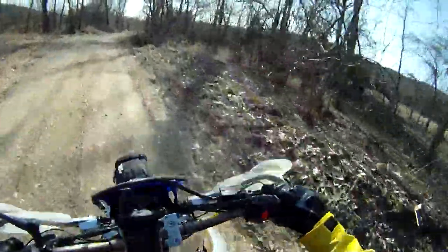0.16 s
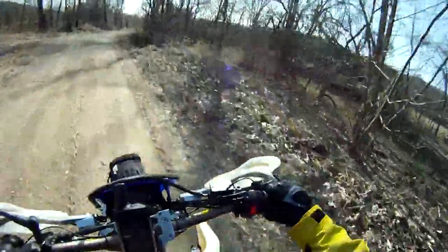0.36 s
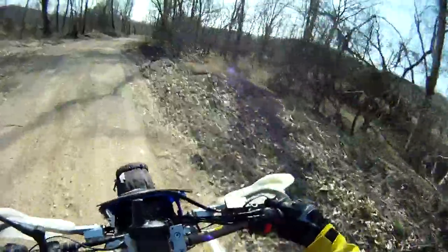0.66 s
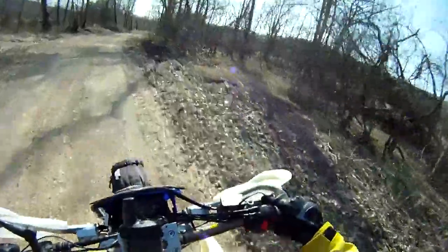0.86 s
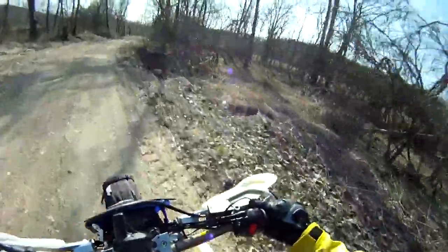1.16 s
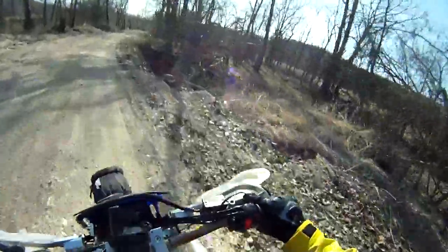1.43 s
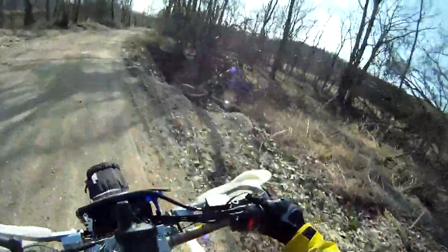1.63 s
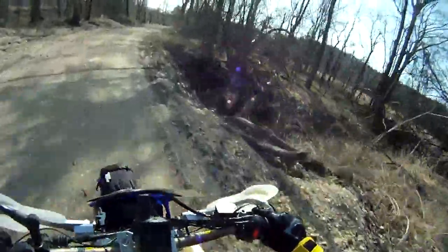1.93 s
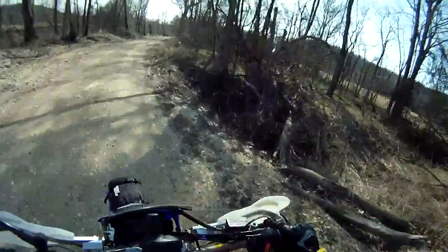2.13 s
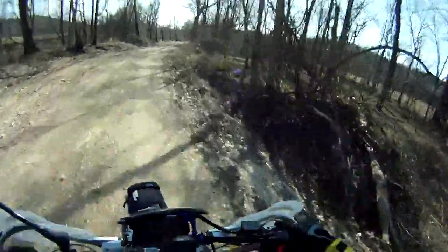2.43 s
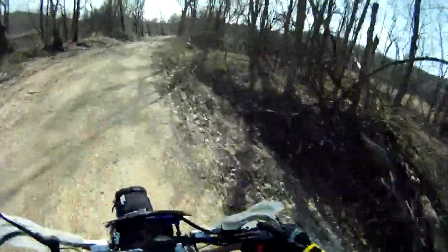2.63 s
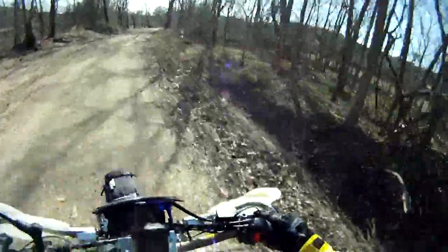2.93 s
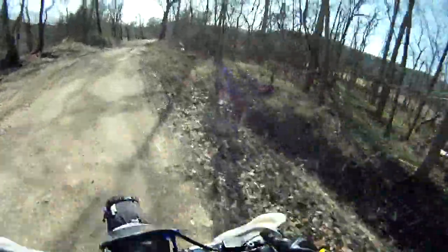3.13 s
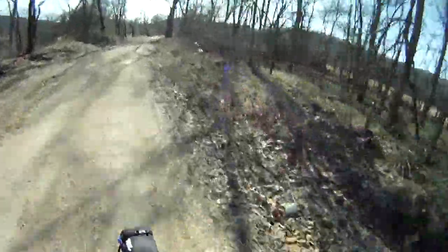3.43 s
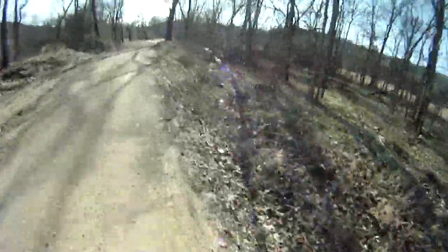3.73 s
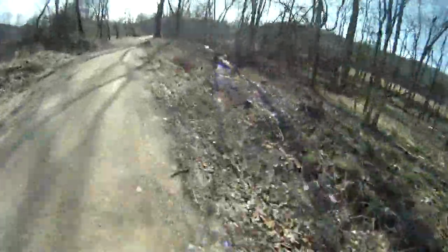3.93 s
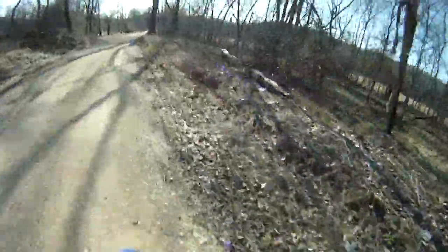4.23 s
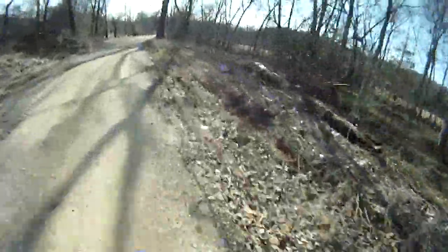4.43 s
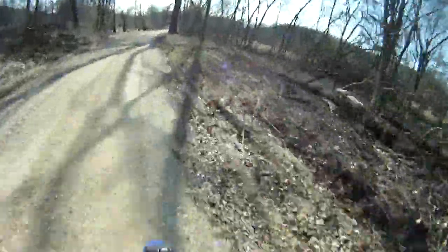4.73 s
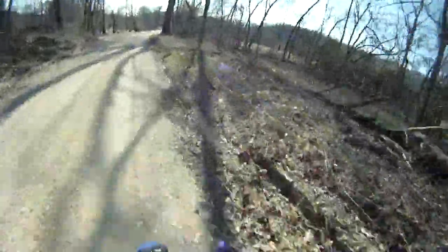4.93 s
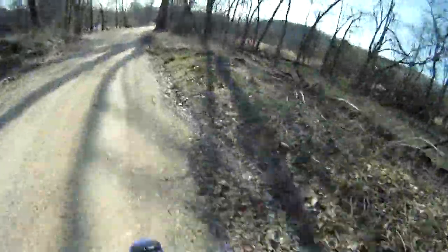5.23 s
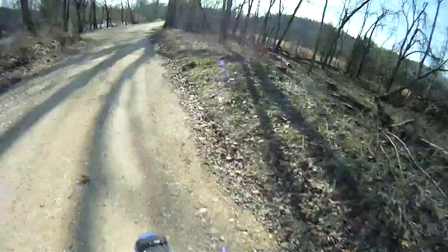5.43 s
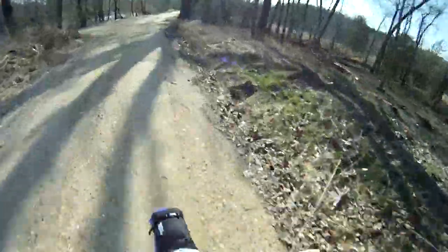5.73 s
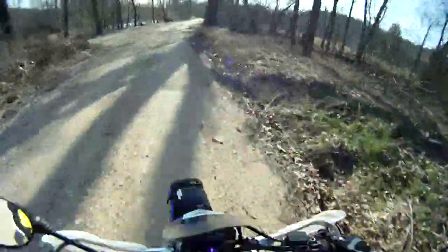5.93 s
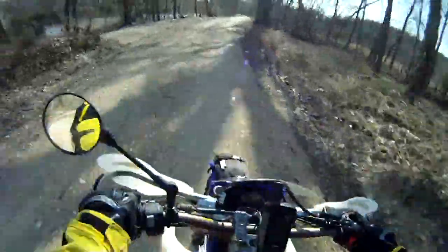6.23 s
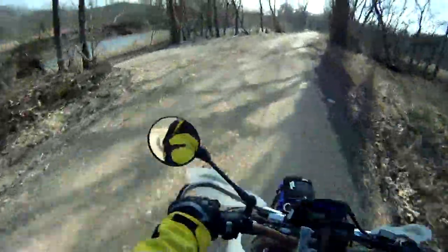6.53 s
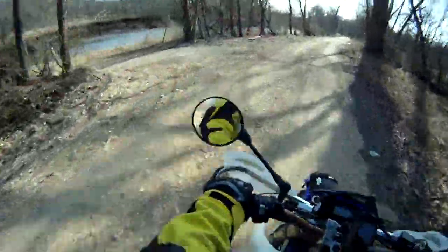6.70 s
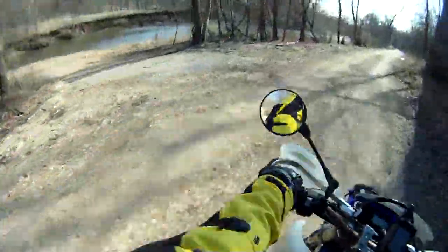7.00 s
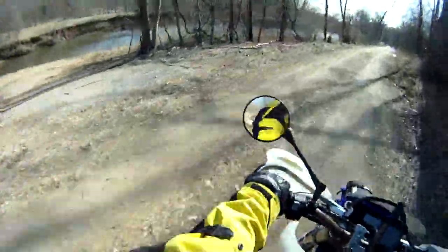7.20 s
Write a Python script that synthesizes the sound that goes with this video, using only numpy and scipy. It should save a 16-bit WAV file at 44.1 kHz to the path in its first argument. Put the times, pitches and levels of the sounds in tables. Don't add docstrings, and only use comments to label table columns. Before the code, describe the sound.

A single-cylinder dirt bike accelerates hard through a gear change, then shuts off and coasts with two popping backfires, heard from the rider's helmet.

```python
import sys
import numpy as np
from scipy import signal
from scipy.fft import rfft, irfft, next_fast_len
from scipy.io import wavfile
from scipy.ndimage import uniform_filter1d, map_coordinates

SR = 44100
rng = np.random.default_rng(int(sys.argv[2]) if len(sys.argv) > 2 else 0)


def amplitude_ratio(level_db):
    exponent = np.asarray(level_db, float) / 20
    return 10 ** exponent


def transcribe(signal):
    frames = np.atleast_2d(signal).T
    limited = np.clip(frames, -1, 1)
    pcm = np.round(limited * 32767).astype(np.int16)
    wavfile.write(sys.argv[1], SR, pcm)


N = 324576

# (time [s], speed [turns/s])
CRANK_SPEED = [(0.0, 41.41), (0.5, 42.97), (0.62, 44.34), (1.12, 45.28), (2.0, 59.39), (2.25, 64.04),
               (2.5, 71.1), (2.88, 47.53), (3.62, 53.01), (4.62, 59.32), (5.38, 62.76), (5.88, 64.05),
               (6.12, 66.05), (6.25, 59.44), (6.38, 60.5), (6.5, 58.68), (6.88, 57.1), (7.36, 51.44)]
# (time [s], opening [0-1])
THROTTLE = [(0, 1), (2.52, 1), (2.6, 0), (2.85, 0), (2.93, 1), (6.1, 1), (6.2, 0), (7.36, 0)]
# (time [s], silencer bark level [dB])
LOAD = [(0.0, -36.5), (1.1, -33), (1.72, -21.5), (2.04, -29), (2.09, -19), (2.38, -17), (2.52, -22),
        (2.55, -31.5), (2.66, -41.5), (2.76, -26), (2.84, -38), (2.95, -30.5), (3.7, -22.5), (4.9, -27.5),
        (6.06, -25.5), (6.15, -32.5), (6.8, -40), (7.36, -40)]
# (time [s], road speed over crank speed [ratio])
GEARING = [(0, 1), (2.5, 1), (2.88, 1.5), (7.36, 1.5)]
# (time [s], added share [dB], half length [s])
SNATCH = [
    (2.04, -7, 0.14),
    (3.1, -6, 0.17),
    (6.62, -5, 0.2),
]
# (frequency [Hz], width [Hz], level [dB])
CASING = [(2209, 109, -0.5), (2402, 133, 2), (2673, 87, -6), (2940, 190, -8.5), (3425, 175, -8),
          (3950, 120, -8.5), (5370, 380, -15)]


def unit(x):
    return x / np.sqrt(np.mean(x ** 2) + 1e-20)


def steady(x):
    return x / np.sqrt(np.abs(uniform_filter1d(x ** 2, SR // 6)) + 1e-12)


def curves(rows):
    s, *columns = np.transpose(rows)
    return [np.interp(np.arange(N) / SR, s, column) for column in columns]


def wobble(rate_hz):
    knots = rng.standard_normal(int(N * rate_hz / SR) + 4)
    return map_coordinates(knots, [np.arange(N) * rate_hz / SR])


def swells(rows):
    t = np.arange(N) / SR
    return sum(amplitude_ratio(db) * np.exp(-((t - s) / half_s) ** 2) for s, db, half_s in rows)


def filtered(x, response):
    m = next_fast_len(N + SR // 2)
    return irfft(rfft(x, m) * response(np.fft.rfftfreq(m, 1 / SR)), m)[:N]


def resonances(modes):
    def response(f):
        total = 0
        for k, (centre, width, db) in enumerate(modes):
            damping = 1j * f * width
            total = total + (-1) ** k * amplitude_ratio(db) * damping / (centre * centre - f * f + damping)
        return total
    return response


def along(points, hz):
    f, value = np.transpose(points)
    return np.interp(np.log(hz + 1), np.log(f), value)


def noise(spectrum):
    return unit(filtered(rng.standard_normal(N), lambda hz: amplitude_ratio(along(spectrum, hz))))


def level(layer):
    layers = {"boom": (-39.5, 0.36, -0.0426, 0.09, -0.5), "pipe": (-35, -0.16, -0.0235, 0.33, -1.5),
              "rasp": (-33, 0.34, -0.03, 0.2453, 2.1), "hiss": (-42.5, 0.0677, 0.1171, 0.03, 1.55),
              "intake": (-39, -0.12, 0.3858, -0.17, -3), "brake": (-48.5, -0.29, -0.0542, 0.3, 4),
              "thump": (-41.5, .01, 0.0952, -0.06, -1), "flutter": (-44.5, -0.27, 0.2234, 0.1, -0.5)}
    mid_turns_hz, mid_road, mid_load_db = 54, 75, -28
    (speed,), (gear,), (load_db,), (opening,) = map(curves, (CRANK_SPEED, GEARING, LOAD, THROTTLE))
    db, by_turns, by_road, by_load, shut_db = layers[layer]
    db = db + by_turns * (speed - mid_turns_hz)
    db = db + by_road * (speed * gear - mid_road)
    db = db + by_load * (load_db - mid_load_db)
    return amplitude_ratio(db + shut_db * (1 - opening))


def firings(turns, scatter_db, jitter_s):
    # (time [s], gain [dB])
    hard = [(.185, 3), (.601, -2), (.736, -4), (.962, 1.5), (1.026, -8), (1.751, -5), (1.804, 5),
            (1.822, 2), (2.238, -5), (2.377, 3.5), (2.392, 3.5), (3.169, 1.5), (3.891, 5), (4.003, 2.5),
            (4.072, -13), (4.306, 2.5), (4.406, 4), (4.543, 6), (4.577, 7), (4.645, -9), (4.845, 8.5),
            (4.96, 5.5), (4.993, -4), (5.042, 5), (5.65, 7.5), (5.713, 7.5), (5.917, 7), (5.98, 7.5),
            (6.025, 6.5), (6.071, 9)]
    at = np.flatnonzero(np.diff(np.floor(turns)) > 0)
    luck = rng.standard_normal((len(at), 2))
    size_db = scatter_db * luck[:, 0]
    for s, gain_db in hard:
        size_db[np.argmin(np.abs(at - s * SR))] = gain_db
    shift = np.round(jitter_s * SR * luck[:, 1]).astype(int)
    return np.bincount(np.clip(at + shift, 0, N - 1), amplitude_ratio(size_db), N)


def exhaust(turns, speed, pulses):
    # (frequency [Hz], width [Hz], level per pass [dB])
    pipe_modes = [(518.2, 37, -1.5), (641.3, 39, 1), (780, 73, -6.5), (892.4, 52, 2), (1020, 76, -2),
                  (1400, 110, -4), (1523, 73, -3.5)]
    # (frequency [Hz], width [Hz], level [dB])
    chambers = [(1093, 112, 0), (1150, 216, 0), (1185, 145, 0), (1210, 163, 0)]
    tuned_turns_hz, tuned_width_hz, tuned_db = 63, 1.1, 11
    bark_db, = curves(LOAD)
    opening, = curves(THROTTLE)
    gas = rng.standard_normal(N) * (1 + 0.05 * np.cos(2 * np.pi * turns))

    def silencer(f):
        echo = 1 + 0.6 * np.exp(-2j * np.pi * f * 0.00512)
        return echo * np.prod([resonances([mode])(f) for mode in chambers], axis=0)

    bark = steady(filtered(pulses + 0.2 * gas, silencer))
    even = unit(np.sqrt(pulses))
    pipe = steady(filtered(even + 0.12 * gas, lambda f: resonances(pipe_modes)(f) ** 2))
    tune_db = tuned_db * opening / (1 + np.exp((tuned_turns_hz - speed) / tuned_width_hz))
    pipe_gain = amplitude_ratio(tune_db - 5) * level("pipe") * (1 + 1.4 * swells(SNATCH))
    return amplitude_ratio(2) * level("boom") * boom(turns, speed) + amplitude_ratio(bark_db) * bark + pipe_gain * pipe


def boom(turns, speed):
    # (crank order, low revs [dB], middle revs [dB], high revs [dB], shut throttle [dB])
    orders = [(1, -4, -2.5, -8, -1.5), (2, 0, -8, -7.5, 2), (3, -31, -20, -13.5, -6), (4, -4.5, 1, 0, 1.5),
              (5, -7, 1, -9.5, -4), (6, -12, -1.5, -10, -3.5), (7, -0.5, -10.5, -12, -6),
              (8, -3, -9.5, -3.5, -6), (9, -9, -5.5, -20, -4), (10, -8.5, -13, -5.5, -8),
              (13, -3, 0, -6.5, -19), (14, -3.5, -13, -6.5, -22), (16, -5, -7, -0.5, -15),
              (20, -2, -12, -12, -12)]
    revs_at = (44, 54, 64)
    opening, = curves(THROTTLE)
    total = 0
    for order, *revs_db, shut_db in orders:
        open_db = np.interp(speed, revs_at, revs_db)
        db = opening * open_db + (1 - opening) * shut_db + 1.2 * wobble(6)
        total = total + amplitude_ratio(db) * np.sin(2 * np.pi * (round(order) * turns + rng.random()))
    return steady(total)


def afterfire():
    # (time [s], level [dB], length [s])
    burns = [
        (7.019, -22, 0.048),
        (7.057, -17, 0.007),
        (7.06, -26.5, 0.05),
        (7.243, -20, 0.042),
        (7.253, -16, 0.015),
        (7.266, -22.5, 0.063),
    ]
    # (time [s], level [dB])
    bangs = [
        (7.0585, -8),
        (7.2595, -11),
        (7.27, -12),
    ]
    # (frequency [Hz], width [Hz], level [dB])
    pop_modes = [(440, 46, -6), (578, 45, -2.5), (790, 74, -0.5), (1246, 94, -0.5), (2320, 230, -1)]
    t = np.arange(N) / SR
    swell = 0
    for s, db, length_s in burns:
        u = np.clip(t - s, 0, None) / length_s * 4
        swell = swell + amplitude_ratio(db) * u * np.exp(1 - u)
    fronts = np.bincount([round(s * SR) for s, _ in bangs], [-amplitude_ratio(db + 9.5) for _, db in bangs], N)
    burst = swell * rng.standard_normal(N) + fronts
    return amplitude_ratio(15) * filtered(burst, lambda f: resonances(pop_modes)(f) / (1 + (f / 2900) ** 4))


def valve_rasp(turns, pulses):
    beat_db = 2.6 * np.cos(2 * np.pi * turns - 1.2) + 1.5 * np.cos(np.pi * turns + 0.4)
    beat_db = beat_db + 0.97 * wobble(40) + 0.42 * wobble(250)
    strikes = rng.standard_normal(SR // 50) * np.hanning(SR // 50)
    repeated = unit(signal.fftconvolve(np.sqrt(pulses), strikes)[:N])
    rattle = unit(amplitude_ratio(beat_db) * rng.standard_normal(N)) + 1.9 * repeated
    return unit(filtered(rattle, lambda f: resonances(CASING)(f) / (1 + (2050 / (f + 1)) ** 8)))


def gear_whine(turns, speed):
    # (crank order, level [dB])
    meshes = [(43, -9), (46, -10), (54, -7), (64, -8), (61, -6), (73, -2)]
    grid_hz = np.arange(1500, 5500, 10.0)
    casing_gain = np.abs(resonances(CASING)(grid_hz))
    whine = 0
    for order, db in meshes:
        gain = amplitude_ratio(db + 2 + 3 * wobble(3)) * np.interp(order * speed, grid_hz, casing_gain)
        whine = whine + gain * np.sin(2 * np.pi * order * turns + 0.35 * wobble(25))
    return (1 + 0.9 * np.cos(2 * np.pi * turns)) * whine


def chain_slap():
    opening, = curves(THROTTLE)
    slap = noise([(1900, -21), (2500, 5), (2900, 3), (3200, -13), (3800, -47)])
    return (1 - opening) * amplitude_ratio(-4 + 1.4 * wobble(9.1)) * slap


def mechanics(turns, speed, pulses):
    parts = valve_rasp(turns, pulses) + gear_whine(turns, speed) + chain_slap()
    return amplitude_ratio(-3) * level("rasp") * (1 + swells(SNATCH)) * parts


def overrun(turns, speed):
    # (crank order, level [dB], loudest at [Hz], width [Hz])
    primary = (20, -37.5, 1185, 50)
    order, db, centre_hz, width_hz = primary
    opening, = curves(THROTTLE)
    near = 1 / (1 + ((order * speed - centre_hz) / width_hz) ** 2)
    tone = np.sqrt(2) * np.sin(2 * np.pi * order * turns + 0.6 * wobble(15))
    return (1 - opening) * near * amplitude_ratio(db + 2.5 * wobble(10)) * tone


def intake(speed):
    roar_road, roar_width, roar_db = 88.7, 2.4, 5.5
    opening, = curves(THROTTLE)
    gear, = curves(GEARING)
    air = unit(filtered(rng.standard_normal(N), resonances([(732, 49, 0)])))
    gain_db = roar_db * opening * np.exp(-((speed * gear - roar_road) / roar_width) ** 2)
    return amplitude_ratio(gain_db - 2) * level("intake") * air


def tyres_and_brakes():
    # (frequency [Hz], density [dB/Hz])
    hiss_spectrum = [(60, -18), (150, -4), (400, -8), (740, 3), (1050, 2), (1300, 1.5), (1800, -4),
                     (3000, -1.5), (4500, -15), (5600, -8)]
    # (time [s], level [dB], half length [s])
    braking = [
        (1.56, -48, 0.073),
        (6.54, -40, 0.26),
        (7.09, -42, .05),
        (7.36, -42, 0.085),
    ]
    hiss = level("hiss") * amplitude_ratio(11.5 + 1.05 * wobble(20)) * noise(hiss_spectrum)
    pads = noise([(3800, -37), (4500, -4.5), (5100, 2), (5700, -2.5), (6000, -25)])
    return hiss + (level("brake") + swells(braking)) * pads


def wind(turns):
    # (time [s], thump level [dB], flutter over thump [dB], half length [s])
    gust_rows = [(.55, -38, -2.5, 0.078), (1.357, -35, -14, 0.034), (1.875, -37, -19, .06),
                 (2.5, -38, -12, 0.06), (2.814, -44, 3, 0.051), (3.084, -31, -14, 0.073),
                 (3.38, -35, -4, 0.036), (3.867, -34, -6, 0.064), (4.08, -40, 3, 0.045),
                 (4.274, -26.5, -4.5, 0.056), (4.476, -29, -12, .06), (4.755, -31, -7, 0.13),
                 (4.89, -35, -8, .04), (5.213, -30.5, -1, .08), (5.412, -31, -3, 0.081),
                 (5.607, -29, -5, .04), (5.863, -38, -4, 0.058), (6.308, -33, -14, .03),
                 (6.48, -32, -16, 0.039), (6.71, -28.5, -4, 0.15), (7.08, -23, -3.5, 0.1),
                 (7.295, -20.5, -11, 0.11)]
    # (frequency [Hz], density [dB/Hz])
    flutter_spectrum = [(15, -14), (40, -16.5), (61, 2), (85, -10), (130, -13.5), (200, -17), (400, -60)]
    thump = level("thump") + swells([(s, db - 5.5, half_s) for s, db, _, half_s in gust_rows])
    flutter_rows = [(s, db + over_db - 7, half_s) for s, db, over_db, half_s in gust_rows]
    flutter = level("flutter") + swells(flutter_rows)
    shake = unit(amplitude_ratio(1.3 * wobble(6.4)) * np.sin(np.pi * turns + 0.75 * wobble(4.2)))
    gusts = noise([(8, -5), (20, -5), (35, -4), (50, -17), (80, -54)])
    return thump * unit(shake + 0.48 * gusts) + flutter * noise(flutter_spectrum)


def scene():
    speed, = curves(CRANK_SPEED)
    turns = 0.52 + np.cumsum(speed) / SR
    spark_turns = turns + 0.005 * (speed - 44)
    pulses = unit(firings(spark_turns, scatter_db=1.4, jitter_s=0.00001))
    engine = exhaust(turns, speed, pulses) + afterfire()
    drive = mechanics(turns, speed, pulses) + overrun(turns, speed)
    return (engine + drive + intake(speed) + tyres_and_brakes() + wind(turns))[None]


def low_pass(x):
    return signal.sosfilt(signal.butter(12, 15640, fs=SR, output="sos"), x)


def record(dry):
    hold_hz, steps = 12000, 4
    band = filtered(dry[0], lambda hz: 1 / (1 + (hz / 5300) ** 12))
    slow = signal.resample_poly(band, hold_hz, SR)
    stairs = np.repeat(np.pad(slow, (0, 4)), steps)
    held = signal.resample_poly(stairs, SR, steps * hold_hz)
    mix = filtered(held, lambda hz: hz < 15320)[None]
    return low_pass(mix)


dry = scene()
out = record(dry)
transcribe(out)
```